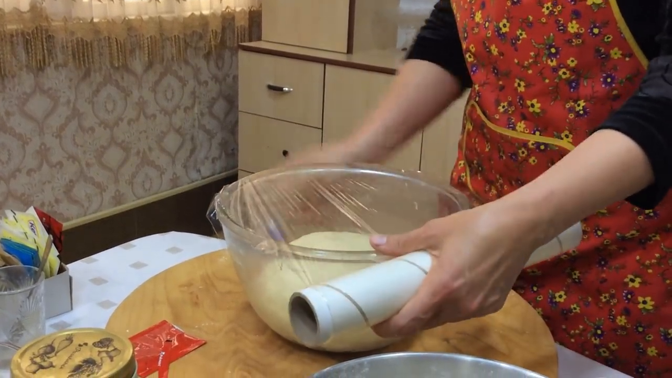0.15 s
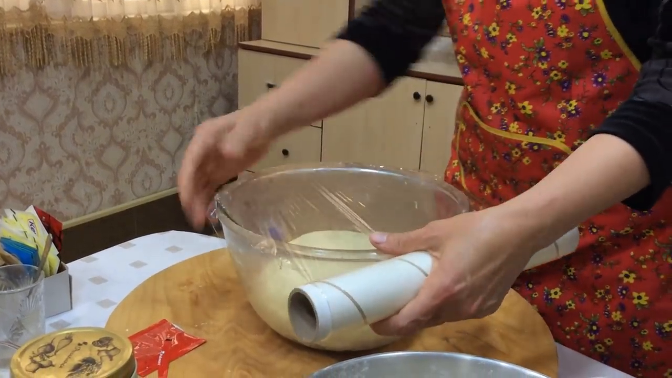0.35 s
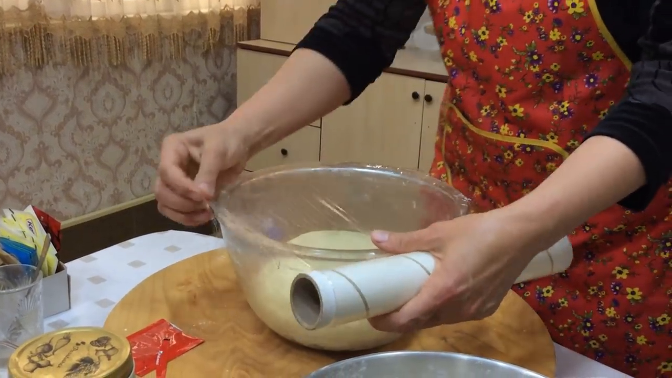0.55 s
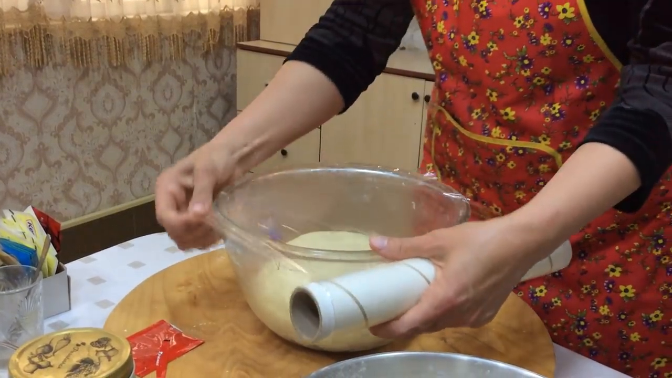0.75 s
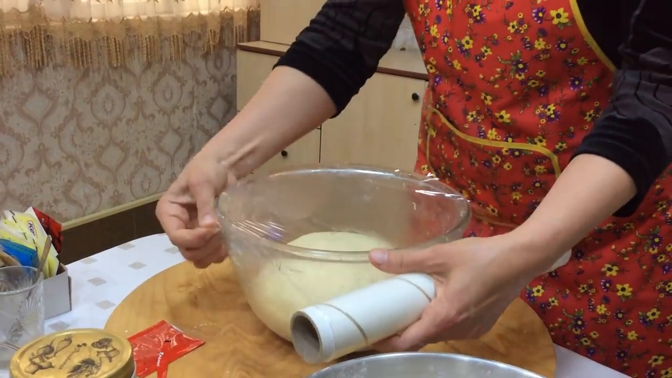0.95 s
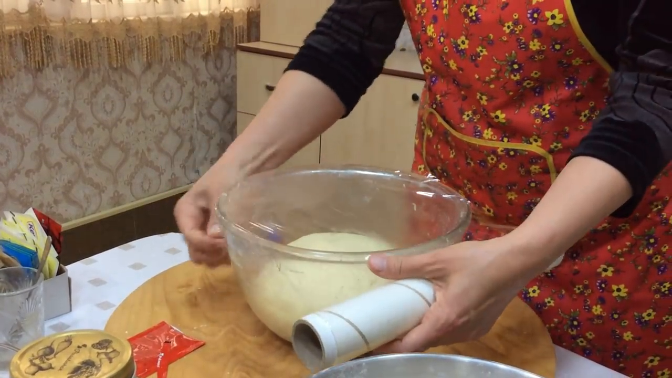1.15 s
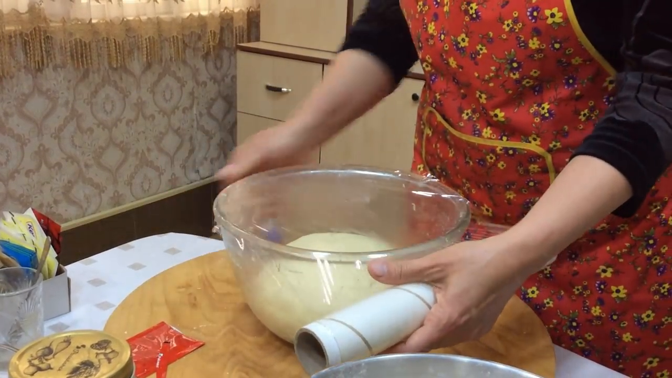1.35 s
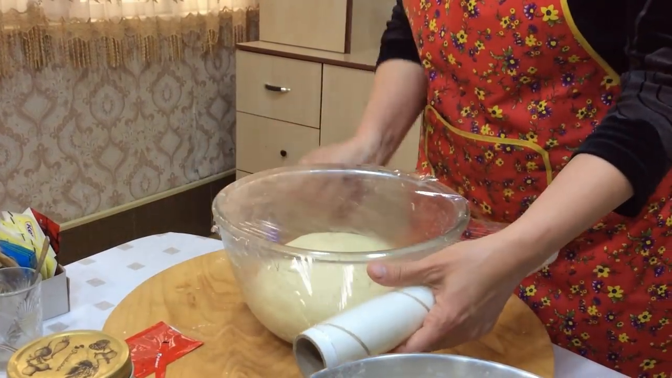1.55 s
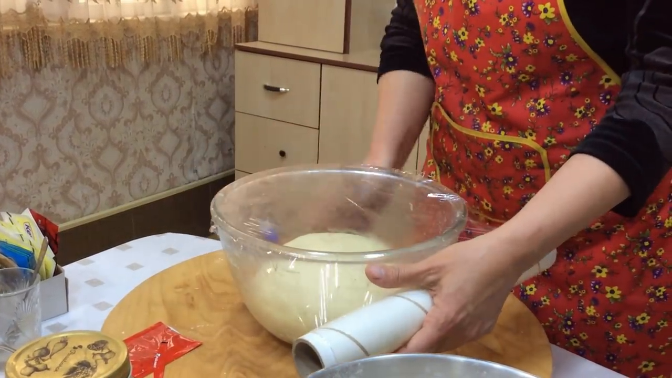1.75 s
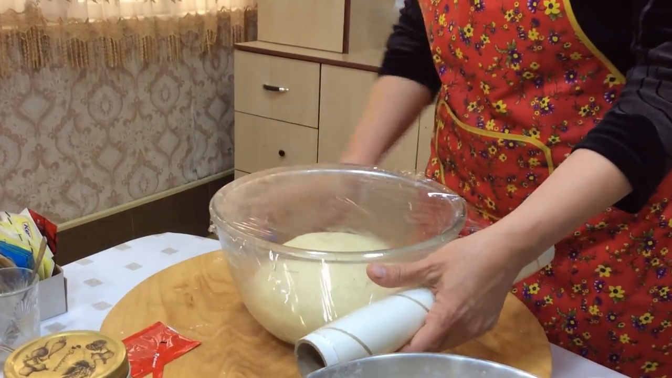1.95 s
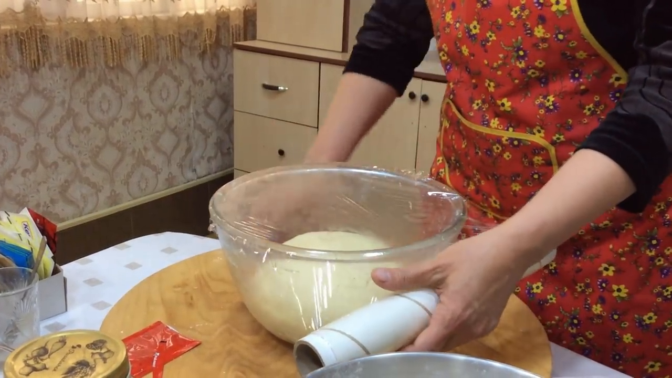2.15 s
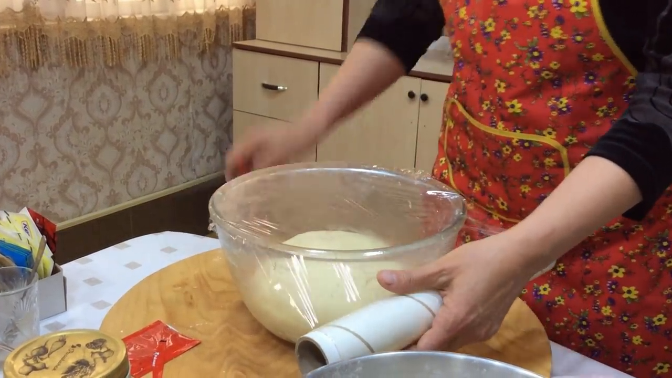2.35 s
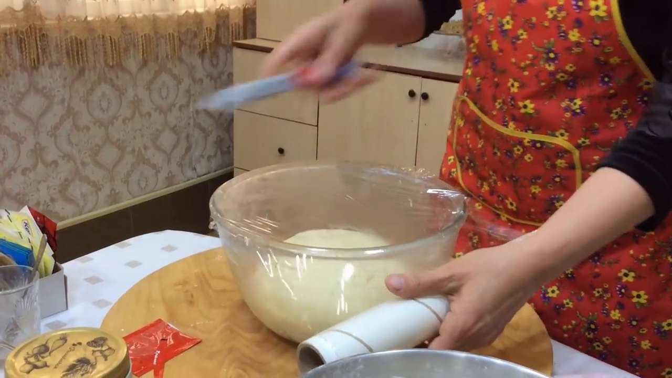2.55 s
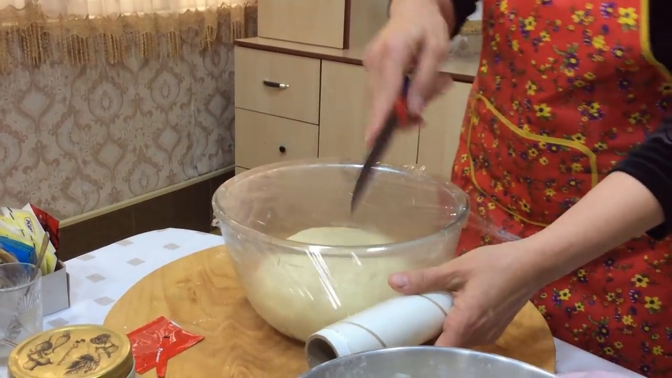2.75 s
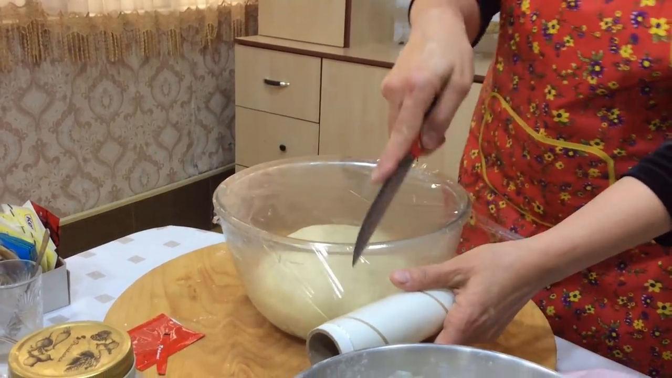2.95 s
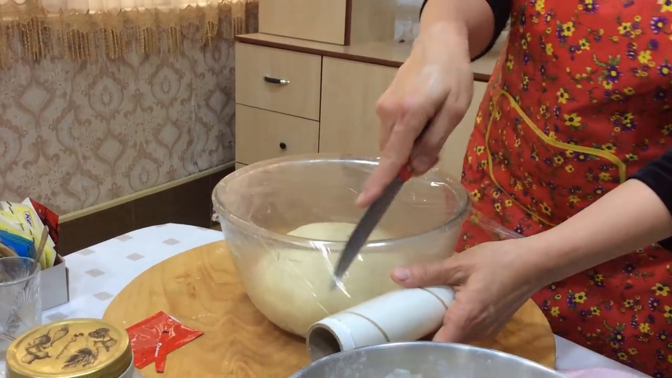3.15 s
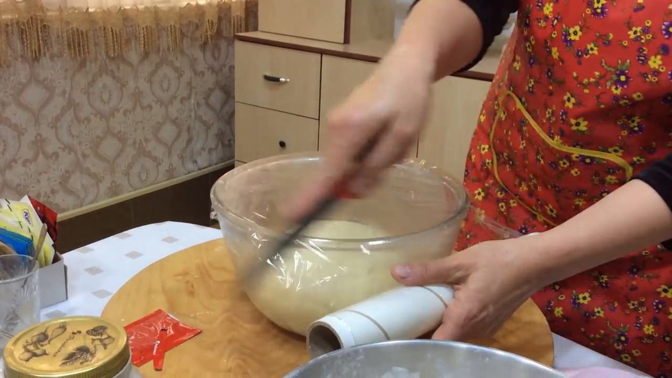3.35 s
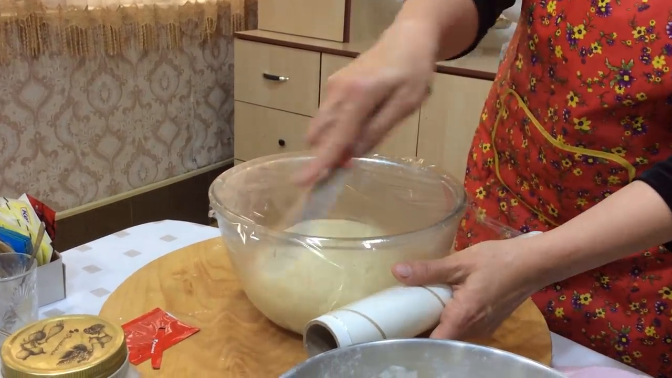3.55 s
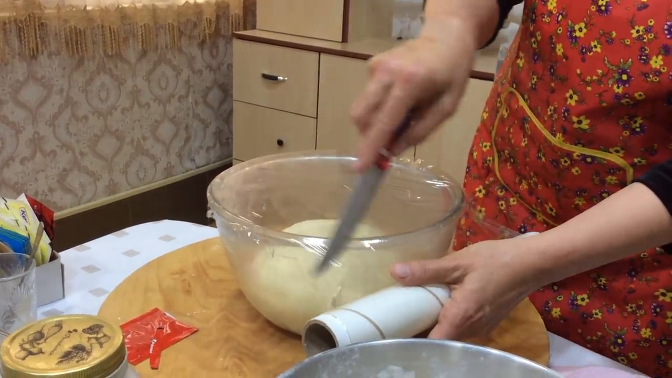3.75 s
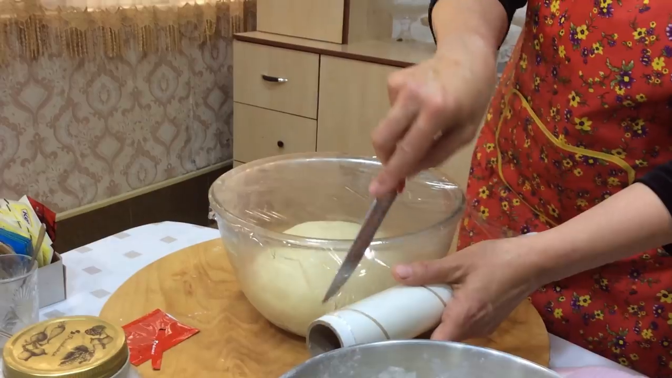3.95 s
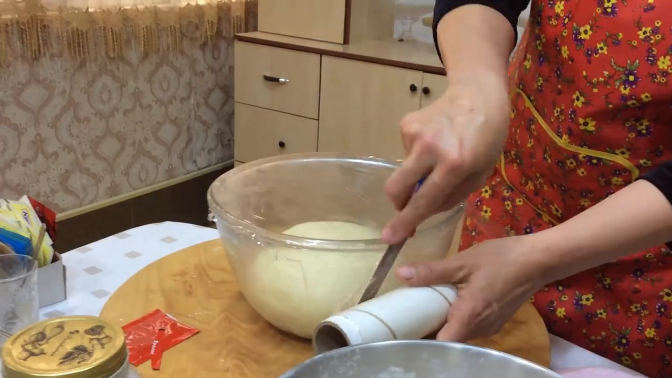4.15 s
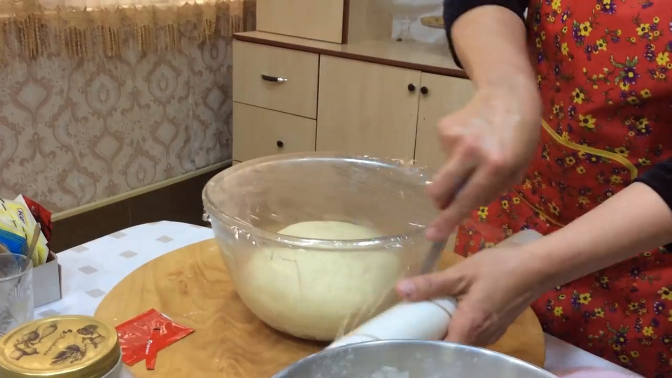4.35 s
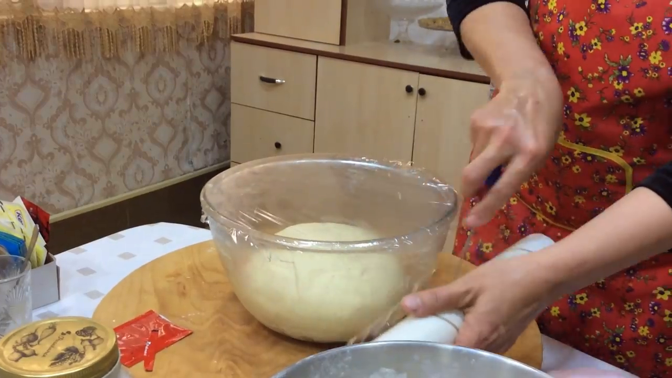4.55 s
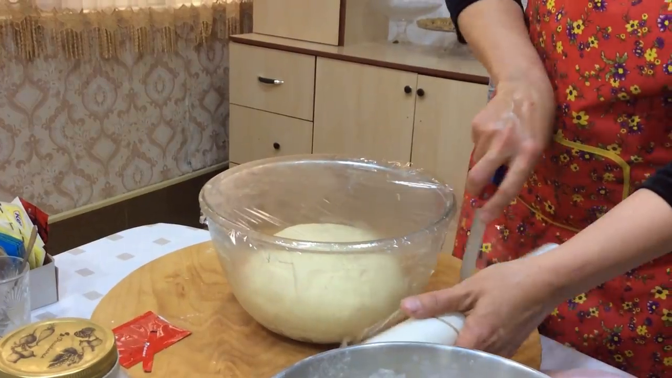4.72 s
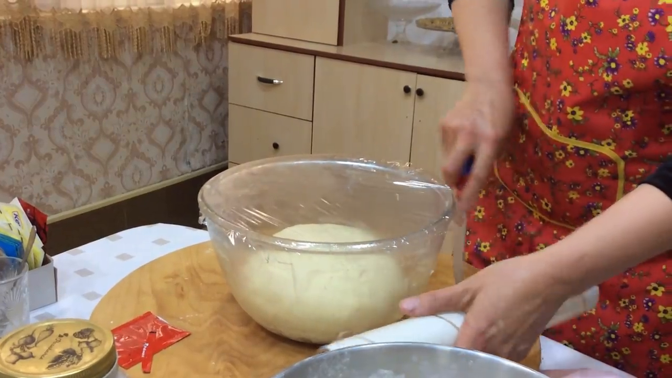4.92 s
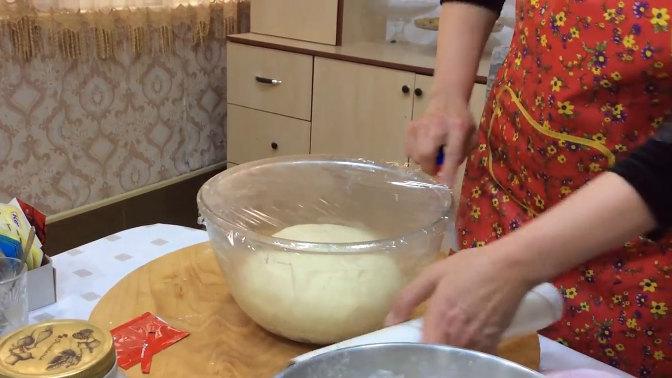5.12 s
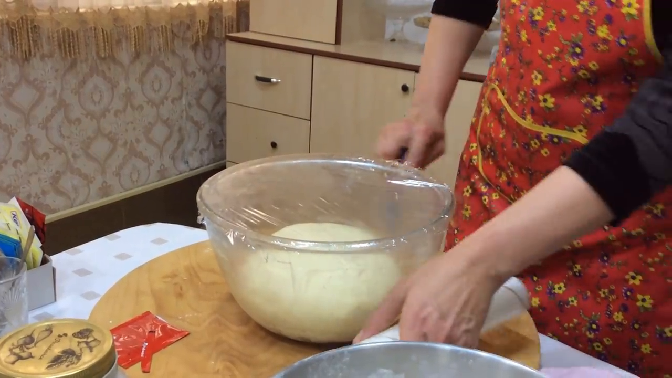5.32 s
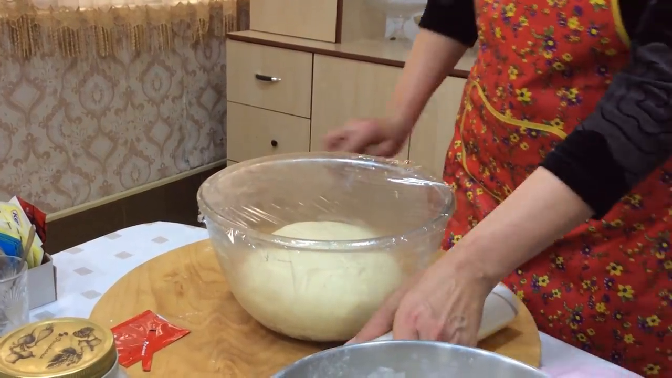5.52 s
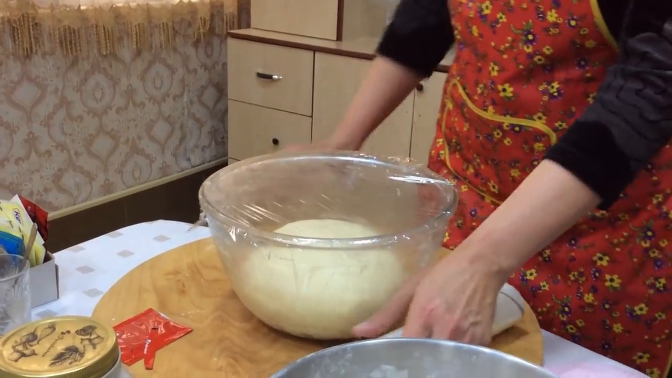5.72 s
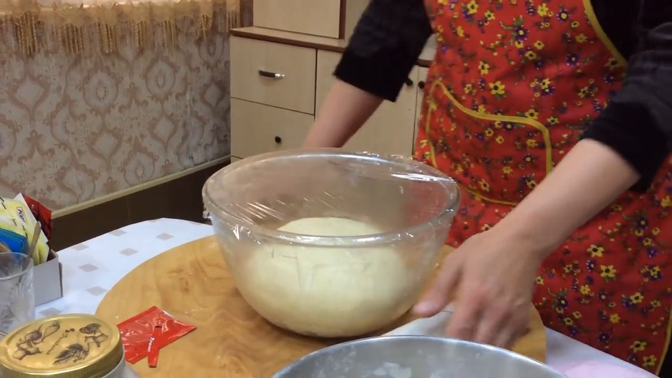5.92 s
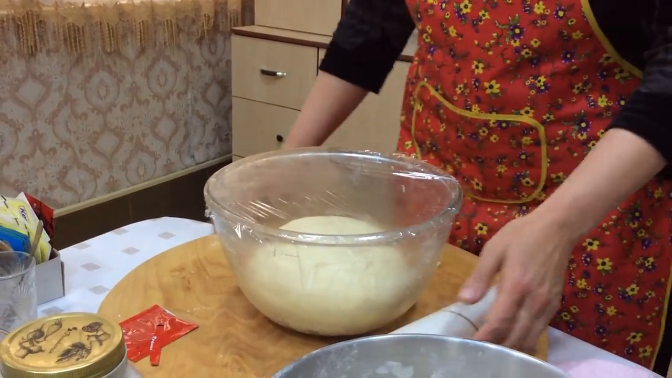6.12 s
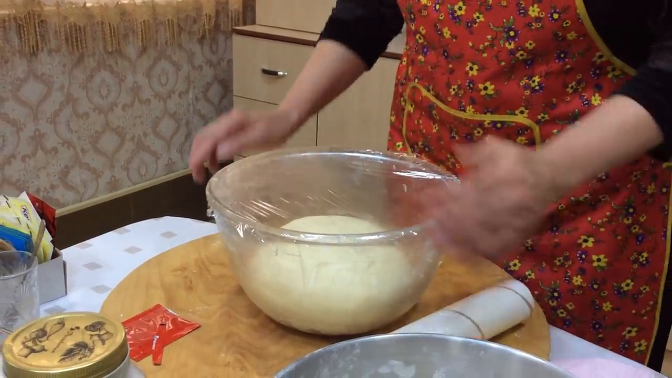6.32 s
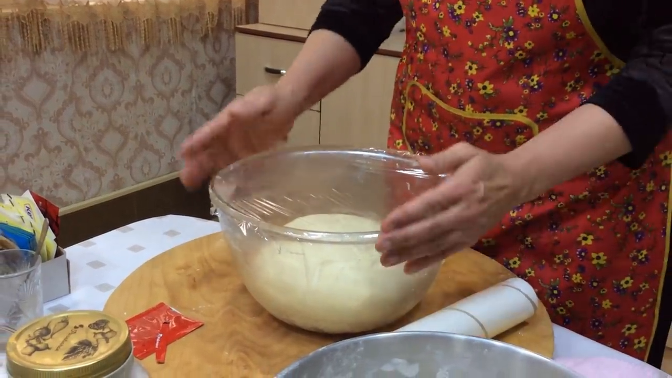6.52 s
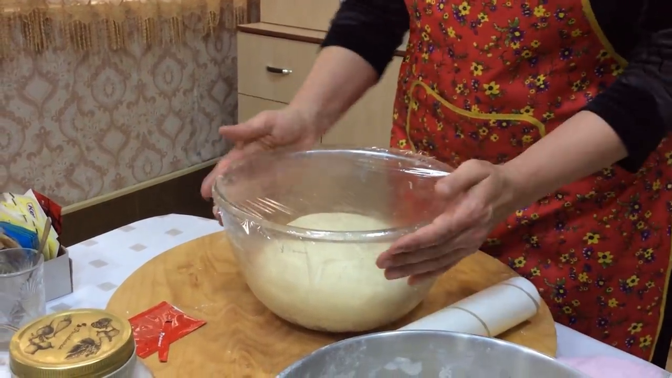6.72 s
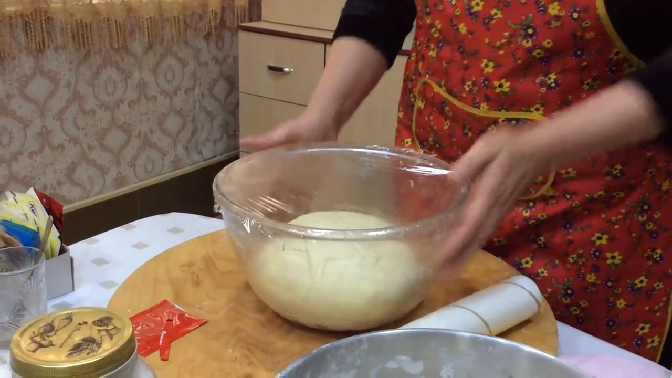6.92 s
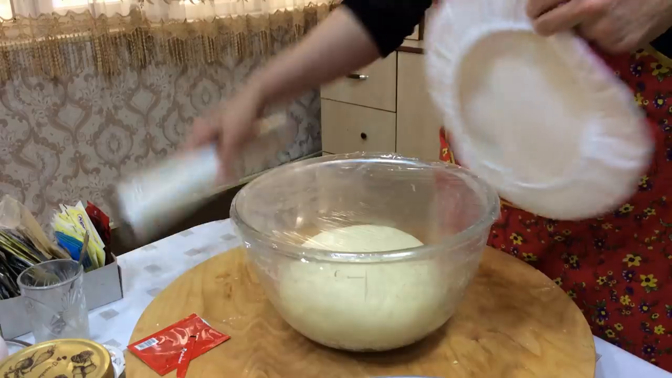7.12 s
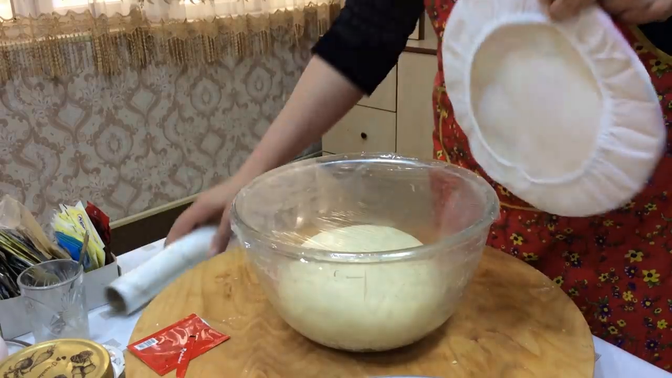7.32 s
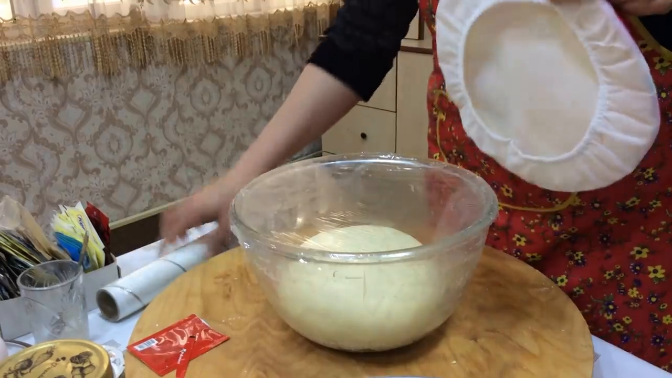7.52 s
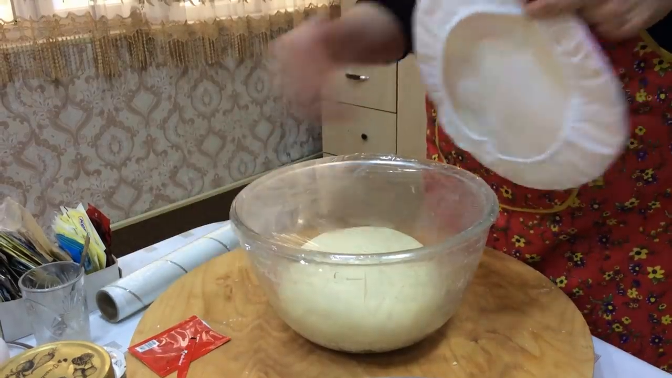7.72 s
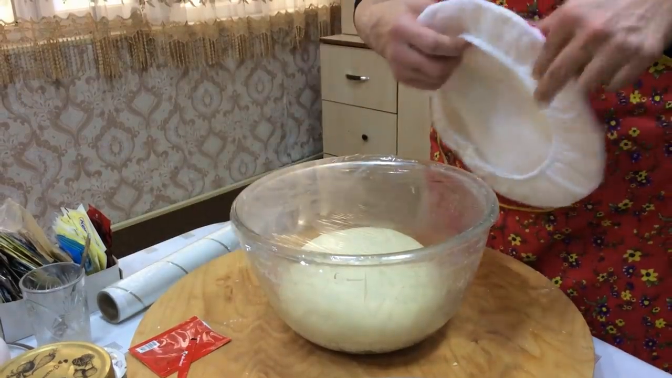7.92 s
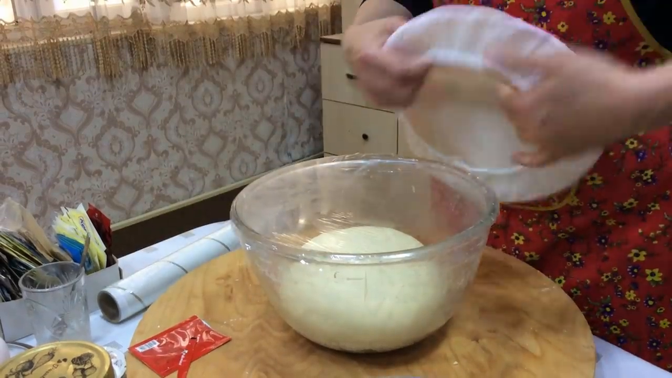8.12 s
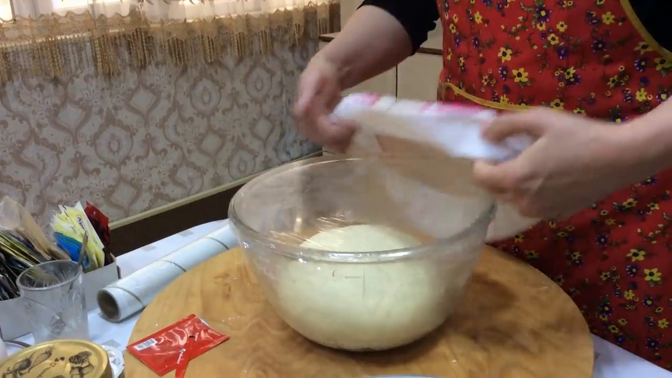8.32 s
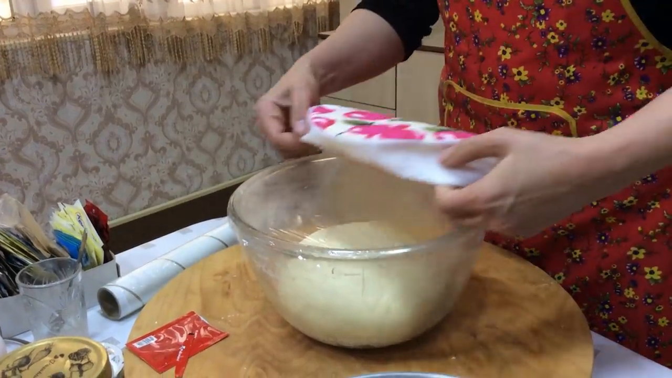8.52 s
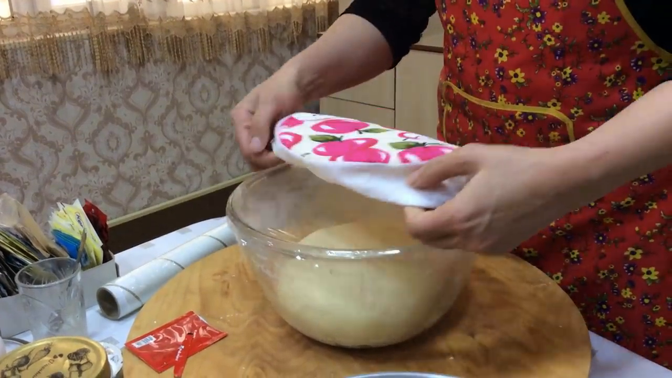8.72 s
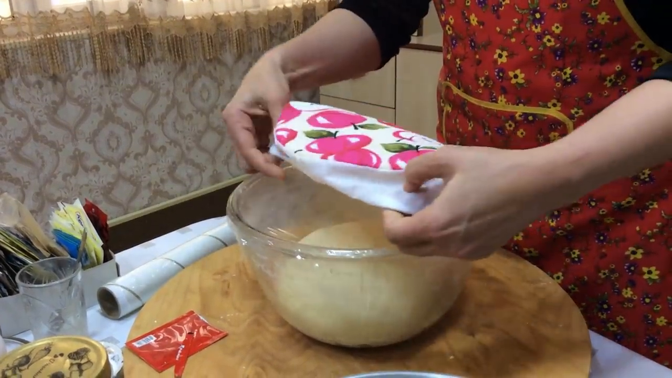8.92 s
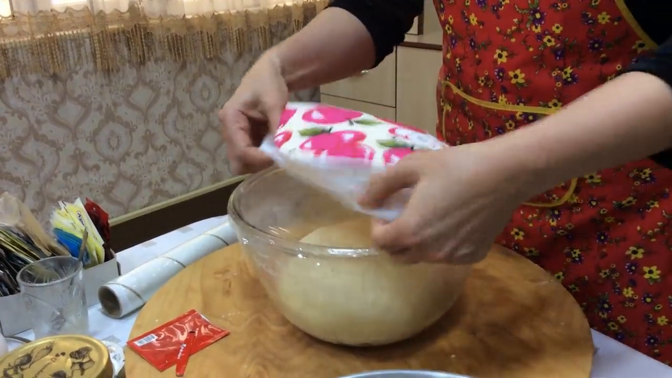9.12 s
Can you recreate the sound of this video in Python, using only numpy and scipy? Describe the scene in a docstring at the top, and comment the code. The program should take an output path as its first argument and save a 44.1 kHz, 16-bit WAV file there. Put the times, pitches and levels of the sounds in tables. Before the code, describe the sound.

Fine plastic hiss and tiny crinkles come first, then a table knock and a light knife rattle. Bright, dry snaps and crackling rips follow as the blade cuts the film, with hollow scraping. Later come dull thuds, a hollow roll clatter, palm swishes, a momentary dropout, another roll knock and quiet fabric. Close microphone, short room echo, steady low hum.

```python
"""A small kitchen: cling film is smoothed over a glass bowl on a wooden board, then slit with a knife.
The taut film snaps (cracks that also thump the sheet) and crackles (showers of tiny ruptures) as it parts.
Knife, hands and cardboard roll knock as struck sets of modes; hands on film and cloth are coloured random slips.
The film squeaks, a cloth cover wafts air, and an appliance hums throughout under the room air."""
import sys
import numpy as np
from scipy import signal
from scipy.fft import rfft, irfft
from scipy.io import wavfile

SR = 44100
rng = np.random.default_rng(int(sys.argv[2]) if len(sys.argv) > 2 else 0)


def store_wav(level_fs):
    """Save 16-bit WAV to argv[1]."""
    pcm = np.round(np.clip(np.atleast_2d(level_fs), -1, 1) * 32767)
    wavfile.write(sys.argv[1], SR, pcm.T.astype(np.int16))


N = 404397
TIME = np.arange(N) / SR

# colour of film cracking: (frequency [Hz], spectrum level before scaling to unit power [dB per Hz])
FILM_CRACK_COLOUR = [(150, -27.5), (600, -9), (1300, -2), (2000, -0.5), (3200, 3.5), (6000, 2.5),
                     (10000, -1), (15500, -2.5)]
# the slit sheet goes slack and its free span shortens:
# (time [s], drumming relative to the crackle [dB], pitch of the sheet's modes [ratio])
SHEET_TAUTNESS = [(3.33, -1.5, 1.0), (3.41, -13, 1.0), (4.2, -22, 1.15)]


def from_db(db):
    """Decibels to amplitude gain."""
    return 10 ** (np.asarray(db) / 20)


def rms_one(x):
    """Scale to unit power."""
    return x / np.sqrt(np.mean(x ** 2) + 1e-20)


def level(rows, column):
    """Gain in time from a dB column, inaudible outside its rows."""
    rows = np.array(rows)
    return from_db(np.interp(TIME, rows[:, 0], rows[:, column], left=-200, right=-200))


def at_hz(points, hz):
    """Read a table along log frequency."""
    table_hz, value = np.transpose(points)
    return np.interp(np.log(np.maximum(hz, 1)), np.log(table_hz), value)


def colour(x, spectrum, size=4096):
    """Causal, minimum-phase filter of unit power gain."""
    gain = rms_one(from_db(at_hz(spectrum, np.fft.rfftfreq(size, 1 / SR))))
    # folding the cepstrum onto positive time gives minimum phase
    cepstrum = irfft(np.log(gain))
    cepstrum[1:size // 2] *= 2
    cepstrum[size // 2 + 1:] = 0
    return signal.oaconvolve(x, irfft(np.exp(rfft(cepstrum))))[:N]


def butterworth(x, order, edge_hz, kind):
    """Keep the highs ("high"), the lows ("low") or a band ("band") with a Butterworth filter."""
    return signal.sosfilt(signal.butter(order, edge_hz, kind, fs=SR, output="sos"), x)


def drift(per_s):
    """Random wander with a spread of one, drawn afresh per_s times a second and joined by straight lines."""
    return rms_one(np.interp(TIME * per_s, np.arange(N), rng.standard_normal(N)))


def add(track, s, sound):
    """Mix a sound in at a time."""
    start = round(s * SR)
    track[start:start + len(sound)] += sound[:N - start]


def swell(s, length):
    """A smooth rise and fall, reaching zero one length either side of its middle."""
    return np.clip(1 - ((TIME - s) / length) ** 2, 0, 1) ** 2


def build_and_die(s, db, build_s, die_s):
    """Gain growing exponentially to a peak and dying after it, 20 dB in each given time."""
    return from_db(db - 20 * np.maximum((s - TIME) / build_s, (TIME - s) / die_s))


def ringing(modes, spread_db):
    """One blow on a body: decaying sines, every mode with a random strength of its own."""
    t = np.arange(SR // 2) / SR
    hz, db, t60 = np.array(modes).T[:, :, None]
    sign = (-1) ** np.arange(len(hz))[:, None]   # neighbouring modes start in opposite phase
    strength_db = db + spread_db * rng.standard_normal(hz.shape)
    decay = from_db(strength_db - 60 * t / t60)
    return np.sum(sign * decay * np.sin(2 * np.pi * hz * t), axis=0)


def grains(per_s, spread_db):
    """Tiny random slips of unequal size, at unit power."""
    sizes = from_db(spread_db * np.minimum(rng.exponential(1, N), 4))
    happens = rng.random(N) < per_s / SR
    return rms_one(happens * sizes * rng.standard_normal(N))


def in_kitchen(x, wet_db, first_echo_s=0.0034):
    """Direct sound plus sparse echoes that thicken into a tail, its decay time varying with frequency."""
    # reverberation of the kitchen: (frequency [Hz], time to die 60 dB [s])
    room_t60 = [(100, 0.76), (300, 0.37), (900, 0.39), (3000, 0.35), (7000, 0.25), (15000, 0.23)]
    t = np.arange(SR * 3 // 4) / SR
    density = np.clip((t / .04) ** 2, .03, 1)   # full after 40 ms
    present = (rng.random(len(t)) < density) * (t > first_echo_s)
    echoes = rng.standard_normal(len(t)) * present / np.sqrt(density)
    hz, when, cells = signal.stft(echoes, SR, nperseg=256)
    decay = from_db(-60 * when / at_hz(room_t60, hz)[:, None])
    tail = signal.istft(cells * decay, SR)[1]
    return x + from_db(wet_db) * signal.oaconvolve(x, tail / np.linalg.norm(tail))[:N]


def knocks(blows, modes, clatter, clatter_s, tick_db=-31):
    """Soft contacts leave out the high modes, light ones the low; a short clatter and a tick begin each."""
    out, t = np.zeros(N), TIME[:SR // 2]
    for s, db, hard_hz, low_hz in blows:
        contact = clatter * rng.standard_normal(len(t)) * np.exp(-t / clatter_s)
        blow = ringing(modes, spread_db=1.5) + contact
        blow = butterworth(blow, 6, hard_hz, "low")
        # the tick is stronger for hard contacts
        blow = blow + from_db(tick_db) * hard_hz / 1000 * contact * np.exp(-t / .003)
        blow = butterworth(blow, 2, low_hz, "high")
        add(out, s, from_db(db) * blow / np.abs(blow).max())
    return out


def background(air_db=-52.5, hum_db=-51, hum_hz=100, overtone_db=-15):
    """Room air as coloured noise, and an appliance humming at twice the mains rate with one overtone."""
    # colour of the room air: (frequency [Hz], spectrum level before scaling to unit power [dB per Hz])
    air_colour = [(18, -42), (43, -13.5), (69, -11), (86, -12.5), (103, -3), (128, -12), (196, -14.5),
                  (438, -18.5), (769, -29.5), (1180, -31.5), (3000, -37.5), (15000, -39.5)]
    phase = 2 * np.pi * hum_hz * TIME
    hum = np.sqrt(2) * (np.sin(phase) + from_db(overtone_db) * np.sin(2 * phase))
    waver = from_db(.7 * drift(per_s=12))
    air = colour(rng.standard_normal(N), air_colour)
    return from_db(air_db) * air + from_db(hum_db) * waver * hum


def waft(low_hz=130, high_hz=260):
    """The swung cloth cover stirs the air in a low, soft rumble of band-limited noise."""
    # air stirred by the cloth cover: (time [s], level [dB])
    stirred_air = [(8.1, -60), (8.9, -57), (9.17, -48.5)]
    rumble = butterworth(rng.standard_normal(N), 2, [low_hz, high_hz], "band")
    return level(stirred_air, column=1) * rms_one(rumble)


def table_knocks():
    """Knife and hands drive the short modes of the table top."""
    # blows: (time [s], peak level [dB], contact hardness [Hz], lowest pitch driven [Hz])
    table_blows = [(0.748, -40, 480, 180), (2.1475, -21, 3200, 80), (5.637, -24, 1900, 1300),
                   (5.6375, -13, 720, 90), (5.672, -19.5, 1250, 220), (5.688, -20, 500, 170),
                   (7.451, -24.5, 350, 110)]
    # table top: (mode frequency [Hz], strength [dB], time to die 60 dB [s])
    table_modes = [(147, -1.5, 0.09), (200, 5, 0.028), (247, 0.5, 0.06), (325, -1, 0.06), (400, 4, 0.033),
                   (570, -2, 0.025), (660, -6, 0.03), (800, -1, 0.02), (1170, -9, 0.028), (1600, -8, 0.012),
                   (2400, -8, 0.012), (3400, -2, 0.007)]
    return knocks(table_blows, table_modes, clatter=1.0, clatter_s=0.0057, tick_db=-23)


def roll_knocks():
    """Knocks with the cardboard roll's modes: the roll rings briefly on the board, one end landing before the
    other when it is dropped, and a few lighter ticks ring with the same pitches."""
    # blows: (time [s], peak level [dB], contact hardness [Hz], lowest pitch driven [Hz])
    roll_blows = [(4.934, -22.5, 2450, 450), (5.964, -29, 750, 380), (5.9645, -35, 3100, 1700),
                  (6.009, -38, 3000, 3200), (6.1095, -11.5, 2500, 520), (6.1135, -12, 1250, 240),
                  (7.5565, -16.5, 800, 70), (7.566, -18.5, 450, 80)]
    # cardboard roll: (mode frequency [Hz], strength [dB], time to die 60 dB [s])
    roll_modes = [(160, -3, 0.06), (230, -5, 0.03), (393, -1, 0.04), (500, 0, 0.016), (694, 0, 0.03),
                  (872, -2, 0.02), (1165, -2, 0.022), (1427, -6, 0.018), (1620, -7.5, 0.018),
                  (2520, -13, 0.009), (2780, -16, 0.016)]
    return knocks(roll_blows, roll_modes, clatter=1.0, clatter_s=0.009)


def knife_knocks():
    """The knife's modes rattle as it is picked up and sound again as it is laid down."""
    # blows: (time [s], peak level [dB], contact hardness [Hz], lowest pitch driven [Hz])
    knife_blows = [(2.304, -27.5, 4300, 450), (2.322, -35, 4000, 600), (4.9345, -28, 1900, 550)]
    # knife: (mode frequency [Hz], strength [dB], time to die 60 dB [s])
    knife_modes = [(743, -2, .03), (845, -5, .06), (1100, 0, .02), (1500, -17.5, .35), (2070, -2, .014),
                   (2500, 0, .012), (3730, -3, .008)]
    return knocks(knife_blows, knife_modes, clatter=1.0, clatter_s=0.008)


def glass_bowl(rubbed, glass_db=-41):
    """Fingers and blade touch the glass; rubbing the film also sets its modes ringing faintly."""
    # touches: (time [s], peak level [dB], contact hardness [Hz], lowest pitch driven [Hz])
    glass_touches = [(1.422, -42, 2400, 200), (1.556, -49, 1400, 1100), (3.399, -32, 7000, 4500)]
    # glass bowl: (mode frequency [Hz], strength [dB], time to die 60 dB [s])
    bowl_modes = [(398, 0, .2), (1036, -21, .35), (1945, -7, .45), (3185, -8, .25), (4355, -9, .2)]
    touched = knocks(glass_touches, bowl_modes, clatter=0.19, clatter_s=0.0011)
    sympathetic = signal.oaconvolve(rubbed, ringing(bowl_modes, spread_db=1))[:N]
    return touched + from_db(glass_db) * sympathetic


def squeak(waver=.012):
    """Film dragged over the rim sings in a faint gliding tone, a sine of wavering pitch."""
    # the soft squeak: (time [s], mean pitch [Hz], level [dB])
    squeak_path = [(0.801, 385, -64.5), (0.88, 323, -52.5), (0.95, 320, -53.5), (1.12, 355, -66)]
    s, hz, _ = np.transpose(squeak_path)
    pitch = np.interp(TIME, s, hz) * (1 + waver * drift(per_s=49))
    tone = np.sqrt(2) * np.sin(2 * np.pi * np.cumsum(pitch) / SR)
    return level(squeak_path, column=2) * tone


def peeling(start_s=4.3, end_s=5.075, attack_s=0.28, release_s=0.015, peel_db=-46):
    """Gain of the film peeling from the roll: a slow rise, a steady pull and a quick stop."""
    ramps = np.minimum((TIME - start_s) / attack_s, (end_s - TIME) / release_s)
    return from_db(peel_db) * np.clip(ramps, 0, 1)


def sliding(hiss_trim_db=4.5, rub_trim_db=-1, crinkle_db=-12):
    """Film lets go of glass, roll and fingers in a fine hiss; the palms add stray crinkles and a duller rub."""
    # strokes of the hands over film and cloth cover:
    # (middle [s], half length [s], sliding hiss before trim [dB], rubbing before trim [dB])
    hand_strokes = [(0.623, 0.11, -55.5, -63.5), (0.934, 0.29, -63, -73), (1.243, 0.11, -60, -65),
                    (1.345, 0.05, -74, -57), (1.565, 0.03, -75, -55), (1.72, 0.3, -65.5, -63),
                    (6.56, 0.072, -64, -66), (6.755, 0.056, -56, -60.5), (6.937, 0.16, -58, -75),
                    (7.27, 0.12, -66, -63.5), (7.967, 0.089, -59, -58), (8.21, 0.06, -66, -59),
                    (8.52, 0.3, -65, -63)]
    # colours: (frequency [Hz], spectrum level before scaling to unit power [dB per Hz])
    hiss_colour = [(300, -17), (1500, -7), (3000, -15), (6000, -5.5), (10000, -2.5), (13500, -4.5),
                   (16000, -11)]
    rub_colour = [(200, -0.5), (600, -5), (1600, -4.5), (3000, -1.5), (5000, -6), (9000, -49), (16000, -43)]
    hiss, rub = np.zeros(N), np.zeros(N)
    for s, length, slide_db, palm_db in hand_strokes:
        hiss += from_db(slide_db + hiss_trim_db) * swell(s, length)
        rub += from_db(palm_db + rub_trim_db) * swell(s, length)
    grip = from_db(2 * drift(per_s=78))   # the grip catches and lets go
    fine_slips = grip * (hiss + peeling()) * grains(per_s=14000, spread_db=2.5)
    crinkles = from_db(crinkle_db) * hiss * grains(per_s=35, spread_db=1.5)
    palm_slips = grip * rub * grains(per_s=7000, spread_db=0.5)
    return (colour(fine_slips, hiss_colour) + colour(crinkles, FILM_CRACK_COLOUR)
            + colour(palm_slips, rub_colour))


def creases(flick_s=0.0012):
    """Each crease flicks over under the fingers in one tiny, dry tick of decaying noise."""
    # single creases: (time [s], level of the whole tick's energy [dB])
    crease_flicks = [(0.566, -31), (0.823, -27), (1.001, -27), (1.078, -25), (1.556, -34), (3.217, -23)]
    out, t = np.zeros(N), TIME[:SR // 50]
    for s, db in crease_flicks:
        tick = rng.standard_normal(len(t)) * np.exp(-t / flick_s)
        add(out, s, from_db(db) * tick / np.linalg.norm(tick))
    return colour(out, FILM_CRACK_COLOUR)


def blade_scrape(low_hz=810, high_hz=1040, high_db=-9, sharpness=7, catch_db=4):
    """The blade sticks and slips along the film's edge, which answers in two hollow resonances."""
    # sawing strokes: (middle [s], half length [s], level [dB])
    sawing = [(3.43, 0.06, -51), (4.03, 0.11, -60), (4.39, 0.17, -53), (4.72, 0.1, -47)]
    slips = grains(per_s=900, spread_db=2.5) * from_db(catch_db * drift(per_s=45))
    low = signal.lfilter(*signal.iirpeak(low_hz, sharpness, fs=SR), slips)
    high = signal.lfilter(*signal.iirpeak(high_hz, sharpness, fs=SR), slips)
    strokes = sum(from_db(db) * swell(s, length) for s, length, db in sawing)
    return strokes * rms_one(low - from_db(high_db) * high)


def rips(low_hz=4400, high_hz=12000, attack_s=0.004):
    """The slit runs ahead of the blade in a short, shrill zip of tiny ruptures."""
    # quick rips as the last of the film gives way:
    # (time [s], level before the band filter [dB], time to die 20 dB [s])
    quick_rips = [(4.591, -36, 0.03), (4.679, -26.5, 0.08), (4.777, -35, 0.03), (4.786, -29, 0.015)]
    run = sum(build_and_die(s, db, attack_s, die_s) for s, db, die_s in quick_rips)
    zips = run * grains(per_s=6000, spread_db=2)
    return butterworth(zips, 2, [low_hz, high_hz], "band")


def film_tear(drum_low_hz=105, drum_high_hz=520):
    """With each push a crackle of tiny ruptures builds and dies, in fits, and drums on the taut sheet."""
    # pushes of the blade: (greatest strain [s], crackle level [dB], 20 dB build [s], 20 dB decay [s])
    pushes = [(3.2, -49, 0.0054, 0.12), (3.395, -34.5, 0.12, 0.11), (4.15, -43, 0.08, 0.08),
              (4.229, -31.5, 0.03, 0.04), (4.365, -29.5, 0.05, 0.19), (4.495, -37.5, 0.12, 0.085),
              (4.71, -40.5, 0.08, 0.2)]
    strain = sum(build_and_die(*push) for push in pushes)
    fits = from_db(3 * drift(per_s=90)) * strain
    ruptures = grains(per_s=2200, spread_db=3.5)
    drumming = rms_one(butterworth(ruptures, 2, [drum_low_hz, drum_high_hz], "band"))
    s, drum_db, _ = np.transpose(SHEET_TAUTNESS)
    drum_gain = from_db(np.interp(TIME, s, drum_db))
    return colour(fits * ruptures, FILM_CRACK_COLOUR) + fits * drum_gain * drumming


def film_snaps(crack_trim_db=-2):
    """Each snap is a crack with its own pitch and a brief flutter of the freed edge; it also thumps the sheet."""
    # the loudest snaps: (time [s], base level [dB], sheet thump relative to base level [dB])
    loud_snaps = [(0.626, -17, -16), (3.192, -10.5, -14), (3.269, -15, -15.5), (3.312, -13.5, -11),
                  (3.324, -17, -13), (3.336, -16, -12), (3.349, -4.5, -13.5), (3.3738, -8, -13),
                  (3.3866, -7, -15), (3.396, -2.5, -16), (3.3987, 0, -29), (4.052, -23.5, -14.5),
                  (4.095, -12.5, -25.5), (4.141, -16, -25), (4.1484, -0.5, -26), (4.2076, 2, -21),
                  (4.2219, -14, -20), (4.228, -6, -27), (4.2334, -7, -27), (4.3264, -5, -33),
                  (4.336, -2.5, -42), (4.349, 2.5, -27), (4.3935, -6, -28), (4.4495, -13, -26),
                  (4.472, -6, -26), (4.4965, -12, -28), (4.7854, -7, -25)]
    # stretched film: (mode frequency at tautness ratio 1 [Hz], strength [dB], time to die 60 dB [s])
    sheet_modes = [(235, -6, 0.032), (330, -8, 0.05), (575, 2.5, 0.017), (714, -1, .015), (819, 0, 0.025),
                   (987, -11.5, 0.025), (1520, -5, 0.018)]
    t = np.arange(SR // 50) / SR
    cracks, thumps = np.zeros(N), np.zeros(N)
    taut_s, _, taut_ratio = np.transpose(SHEET_TAUTNESS)
    for s, db, sheet_db in loud_snaps:
        crack = .14 * rng.standard_normal(len(t)) * np.exp(-t / .002)   # flutter of the freed edge
        crack[0] = 1
        pitch_hz = rng.uniform(5000, 14000)
        crack = crack + 1.2 * signal.lfilter(*signal.iirpeak(pitch_hz, 1.3, fs=SR), crack)
        add(cracks, s, from_db(db + crack_trim_db) * crack)
        tension = np.interp(s, taut_s, taut_ratio) * rng.uniform(.88, 1.12)   # every snap retunes the sheet
        thump = ringing(np.array(sheet_modes) * [tension, 1, 1], spread_db=2.0)
        add(thumps, s, from_db(db + sheet_db) * thump / np.abs(thump).max())
    return colour(cracks, FILM_CRACK_COLOUR) + butterworth(thumps, 2, 280, "high")


def scene():
    """Film and bowl, then the knocks with a little more echo, in the kitchen; squeak, waft, air and hum have none."""
    rubbed = sliding()
    film = film_snaps() + film_tear() + rips() + blade_scrape() + creases() + rubbed + glass_bowl(rubbed)
    knocking = table_knocks() + roll_knocks() + knife_knocks()
    echoing = in_kitchen(film, wet_db=-6.0) + in_kitchen(knocking, wet_db=-3.3)
    return (echoing + squeak() + waft() + background())[None]


def record(dry, ceiling=.8, cutoff_hz=15400):
    """The sharpest peaks are rounded, the sound drops out for an instant, the top is cut steeply."""
    # the dropout: (start [s], end [s])
    drop_start, drop_end = (7.134, 7.181)
    live = np.clip(np.maximum(drop_start - TIME, TIME - drop_end) / .002, 0, 1)   # 2 ms fades
    rounded = ceiling * np.tanh(dry / ceiling)
    top_cut = signal.ellip(12, .1, 85, cutoff_hz, fs=SR, output="sos")
    return signal.sosfilt(top_cut, rounded * live)


dry = scene()
out = record(dry)
store_wav(out)
```